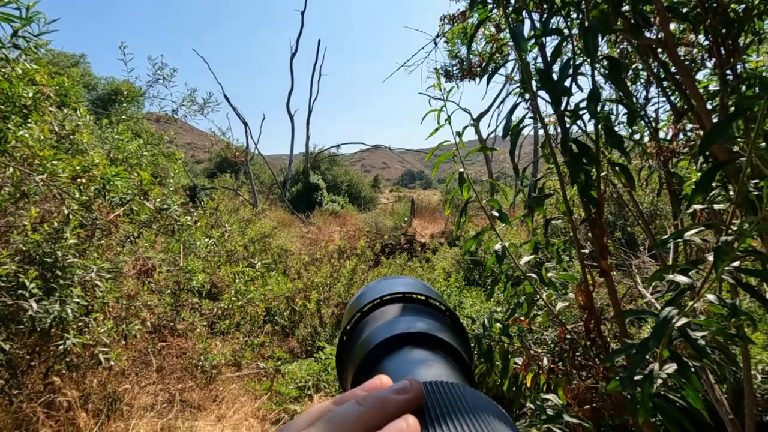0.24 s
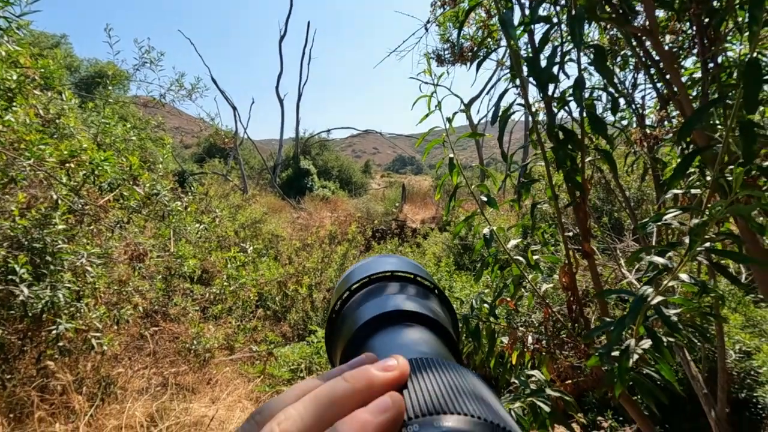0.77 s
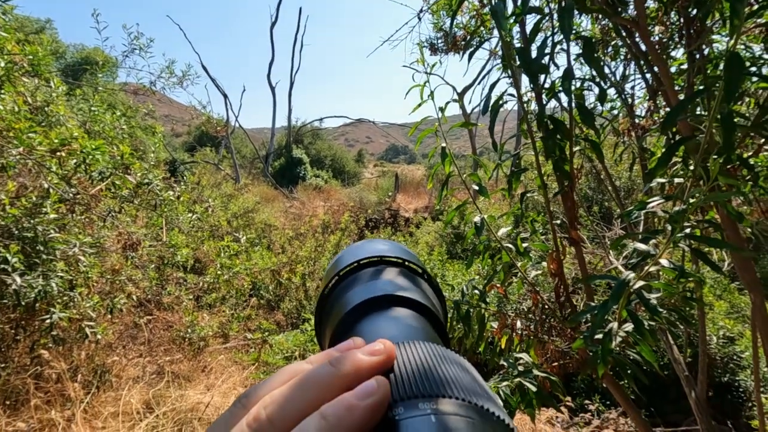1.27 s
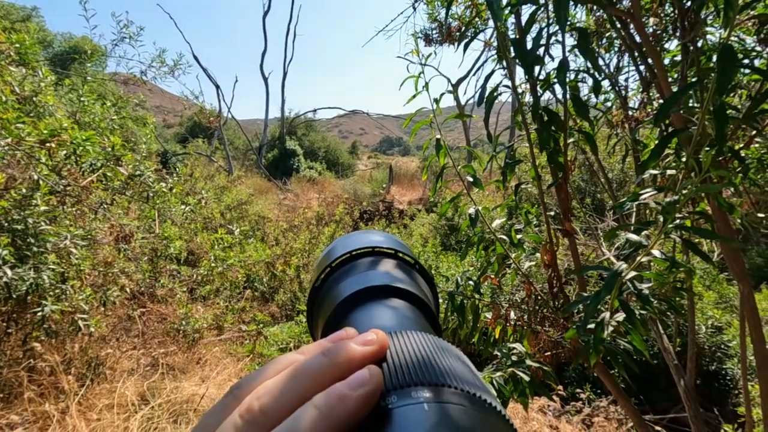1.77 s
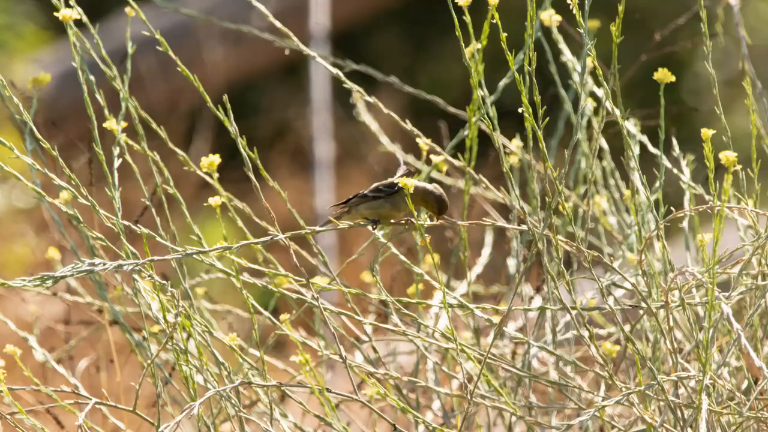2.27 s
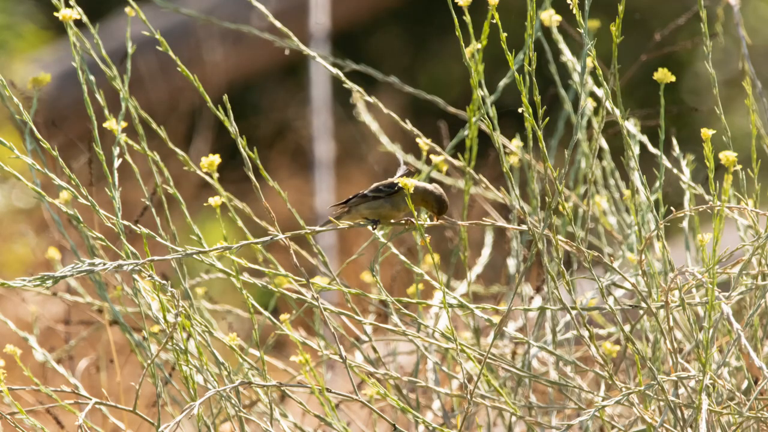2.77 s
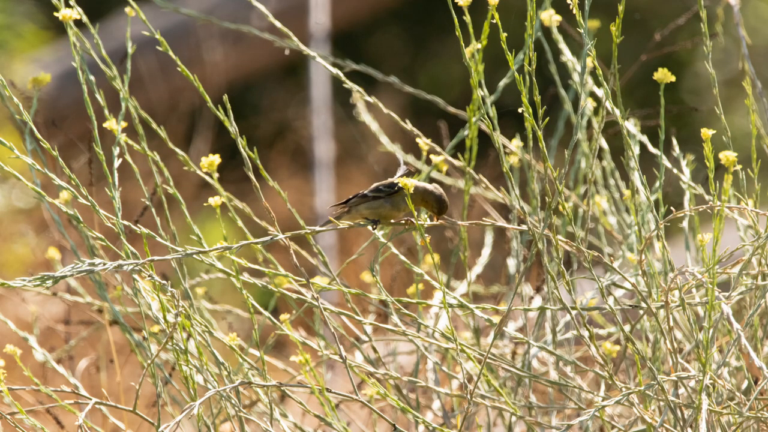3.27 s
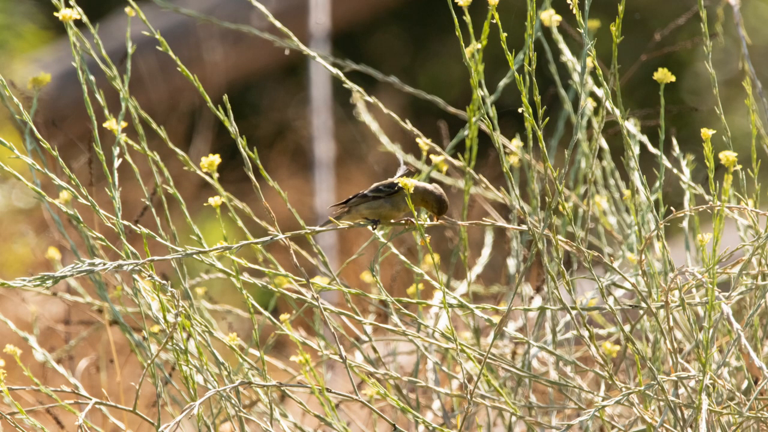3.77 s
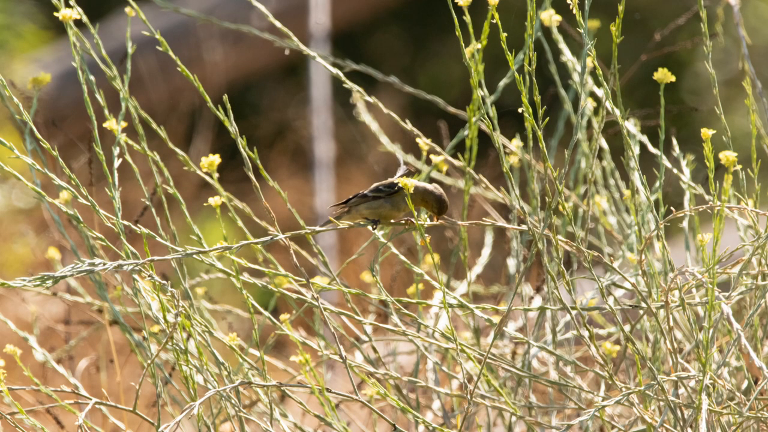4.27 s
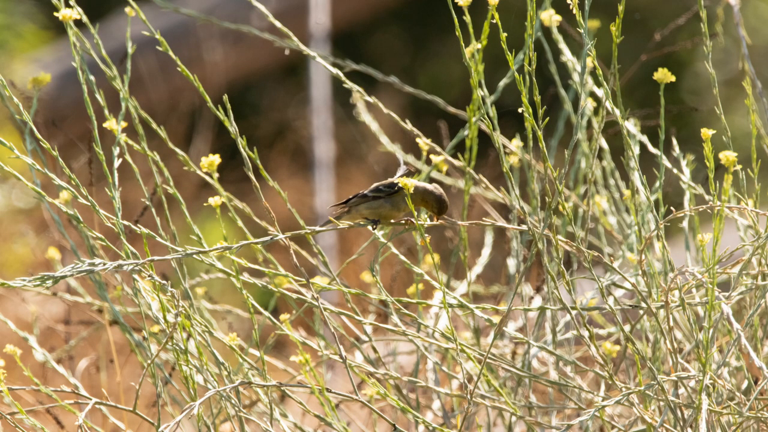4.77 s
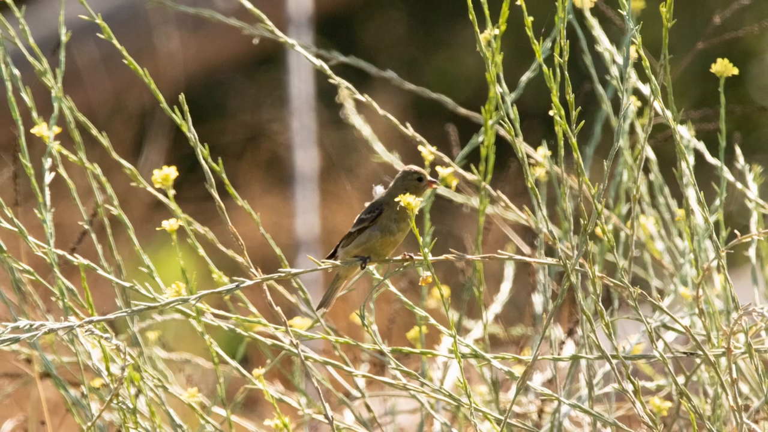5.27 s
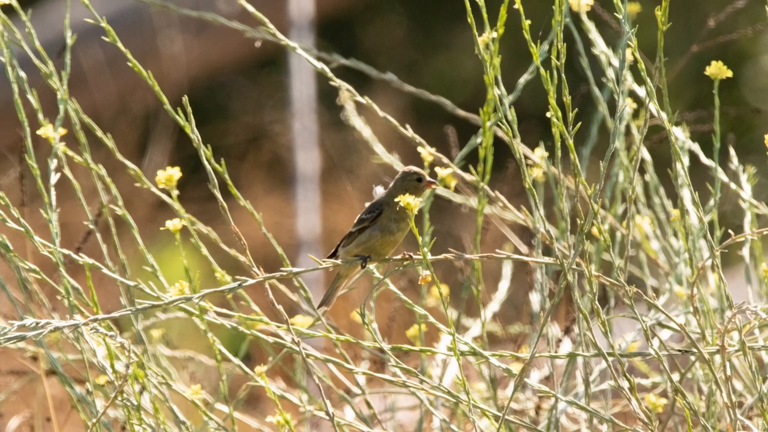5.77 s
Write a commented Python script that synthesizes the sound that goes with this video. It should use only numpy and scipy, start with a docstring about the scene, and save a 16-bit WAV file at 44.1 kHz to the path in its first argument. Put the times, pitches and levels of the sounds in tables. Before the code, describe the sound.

A camera takes two pictures close to the microphone, outdoors in scrubland. First, fingers tick and slide softly on the lens. Then a button clicks and the shutter fires with a short mechanical rattle, followed by a softer click as the button is released. This repeats about three seconds later. Throughout, small birds whistle and rasp faintly in the bushes over a low hum of distant engines and light wind rumble.

```python
"""Reflex camera in scrubland

Two pictures are taken close to the microphone. Each time the button clicks, then mirror, curtains and
recocking gear knock and rattle in the body; a hand ticks and slides on the lens. Small birds whistle
and rasp in the bushes, far engines hum and light air rumbles on the microphone."""
import sys
import numpy as np
from scipy import signal
from scipy.fft import rfft, irfft
from scipy.io import wavfile
from scipy.ndimage import uniform_filter1d

SR = 44100
rng = np.random.default_rng(int(sys.argv[2]) if len(sys.argv) > 2 else 0)


def wrap_up_sound(samples):
    """Save the sound to the file named by the first command line argument, as 16-bit audio."""
    columns = np.atleast_2d(samples).T
    # keep every value between -1 and 1, then stretch to whole-number steps
    tamed = np.clip(columns, -1, 1)
    steps = np.round(tamed * 32767).astype(np.int16)
    wavfile.write(sys.argv[1], SR, steps)


N = 265526
TIME = np.arange(N) / SR

# pictures: shutter opening t/s, mirror swing/s, relative release level/dB, mirror resonance f/Hz
SHOTS = [(2.184, .0325, -26, 2061), (4.9464, 0.018, -39.5, 3380)]
MIRROR_LEAD_S = 0.034   # mirror is up this long before the opening


def from_db(db):
    return 10 ** (np.asarray(db) / 20)


def unit_rms(x):
    return x / np.sqrt(np.mean(x ** 2) + 1e-20)


def in_time(rows):
    """Each column of a curve, at every sample."""
    s, *columns = np.transpose(rows)
    return [np.interp(TIME, s, c) for c in columns]


def add(out, s, sound):
    """Mix a sound in at time s."""
    at = max(round(s * SR), 0)
    out[..., at:at + sound.shape[-1]] += sound[..., :N - at]


def held(t, start, length, rise_db_per_s, fall_db_per_s):
    """Envelope: rises to 1 at the start, holds, dies away."""
    early, late = np.maximum(start - t, 0), np.maximum(t - start - length, 0)
    return from_db(-rise_db_per_s * early - fall_db_per_s * late)


def drift(rate_hz):
    """Random curve, spread about 1."""
    knots = rng.standard_normal(1000)
    return np.interp(TIME * rate_hz, np.arange(len(knots)), knots)


def stereo_noise(size, side_db):
    """White mid/side noise as left and right."""
    mid, side = rng.standard_normal((2, size))
    return mid + from_db(side_db) * np.array([side, -side])


def colour(x, spectrum, size=8192):
    """Minimum-phase filter of unit power gain; spectrum rows: f/Hz, level/dB."""
    hz, db = np.transpose(spectrum)
    log_f = np.log(np.maximum(np.arange(size // 2 + 1), 0.5) * SR / size)
    beyond = np.abs(log_f - np.clip(log_f, np.log(hz[0]), np.log(hz[-1])))
    log_gain = np.log(from_db(np.interp(log_f, np.log(hz), db))) - 2 * beyond   # 12 dB/octave skirts
    cepstrum = irfft(log_gain)
    response = irfft(np.exp(rfft(2 * cepstrum[:size // 2], size)))
    return signal.fftconvolve(x, [response / np.linalg.norm(response)])[:, :N]


def resonate(x, hz, width_hz):
    """One resonance, peak gain 1."""
    r = np.exp(-np.pi * width_hz / SR)
    poles = [1, -2 * r * np.cos(2 * np.pi * hz / SR), r * r]
    return signal.lfilter(np.array([1, 0, -1]) * (1 - r * r) / 2, poles, x + 1e-18)


def scatter(x, t60_s, side_db):
    """Diffuse echoes, unit gain."""
    tail = stereo_noise(SR, side_db) * from_db(-60 * TIME[:SR] / t60_s)
    return signal.fftconvolve(x, tail / np.linalg.norm(tail[0]), axes=1)[:, :N]


def open_air(wind_gain_db=3.5, traffic_gain_db=7, murmur_db=-65, hiss_db=-77.5):
    """Wind rumble, far traffic, a midrange murmur and a thin steady hiss."""
    # wind and traffic strength: t/s, relative level/dB
    gusts = [(1.8, -42.5), (2.6, -47.5), (3.4, -45), (6.02, -44)]
    traffic_level = [(0.0, -57.5), (1.07, -59.5), (2.73, -61), (3.42, -57), (4.93, -56.5), (6.02, -59)]
    # noise spectra: f/Hz, relative density/dB
    wind_spectrum = [(18, -2.5), (32, -2), (45, 3), (60, -6.5), (80, -7.5), (110, -18.5)]
    traffic_spectrum = [(70, -18), (110, 6.5), (290, 0), (420, -6), (700, -17), (1300, -23), (1900, -32.5)]
    hiss_spectrum = [(2500, -1), (7400, -1), (8400, -13), (9200, -6.5), (10150, 7), (10700, 2.5),
                     (11300, -6.5), (13500, -11.5), (14300, -29)]
    murmur_spectrum = [(400, 4), (1300, 4.5), (2000, -5.5), (2800, -20.5)]
    wind_db, = in_time(gusts)
    traffic_db, = in_time(traffic_level)
    wind = from_db(wind_db + wind_gain_db) * colour(stereo_noise(N, side_db=-20), wind_spectrum)
    wind *= from_db([[0], [1.5]])   # stronger on the right
    traffic = colour(stereo_noise(N, side_db=-18), traffic_spectrum)
    traffic *= from_db(traffic_db + traffic_gain_db)
    murmur = from_db(murmur_db) * colour(stereo_noise(N, side_db=-0.5), murmur_spectrum)
    hiss = from_db(hiss_db) * colour(stereo_noise(N, side_db=-5), hiss_spectrum)
    return wind + traffic + murmur + hiss


def engine_tone(hz, db, waver_db=3.5):
    """One engine line, its level wavering on the way through the air."""
    amplitude = np.sqrt(2) * from_db(db + waver_db * drift(7))
    return amplitude * np.sin(2 * np.pi * (np.cumsum(hz) / SR + rng.random()))


def engines(swell_at_s=4.62, swell_width_s=0.76, swell_db=-53.5, swell_hz=260.7, climb_hz_per_s=15):
    """Two far engines, one steady, one growing; a higher note climbs as it swells and fades."""
    # steady engine: t/s, f/Hz, relative level/dB
    drone = [(0.0, 141.1, -47), (1.32, 145.9, -46.5), (5.87, 147.8, -49.5)]
    # growing engine, second harmonic: t/s, f/Hz, relative level/dB
    second_harmonic = [(0.2, 242, -55.5), (1.6, 243.8, -58.5), (4.88, 240.3, -48), (5.9, 233.7, -57.5)]
    # its fundamental: t/s, relative level/dB
    fundamental = [(0.29, -58.5), (3.29, -54.5), (3.34, -47), (5.9, -48.5)]
    drone_hz, drone_db = in_time(drone)
    second_hz, second_db = in_time(second_harmonic)
    bass_db, = in_time(fundamental)
    firing_hz = second_hz / 2
    orders_db = [bass_db - 2, second_db - 3, second_db - 14]
    growing = sum(engine_tone(k * firing_hz, db) for k, db in enumerate(orders_db, 1))
    t = TIME - swell_at_s
    swell = np.exp(-(t / swell_width_s) ** 2) * engine_tone(swell_hz + climb_hz_per_s * t, swell_db)
    return engine_tone(drone_hz, drone_db - 3) + growing + swell


def syllable(length_s):
    """Progress 0-1 through a bird's note, and its rounded envelope."""
    u = np.linspace(0, 1, int(length_s * SR))
    return u, np.sqrt(np.abs(np.sin(np.pi * u)))


def whistle(length_s, hz, glide_oct, quaver_hz=55):
    """Gliding note with a fast quaver in pitch and flutter in level."""
    u, envelope = syllable(length_s)
    quaver, flutter = (unit_rms(uniform_filter1d(n, size=90)) for n in rng.standard_normal((2, len(u))))
    pitch_hz = hz * 2 ** (glide_oct * (u - 0.5)) + quaver_hz * quaver
    return envelope * unit_rms(np.exp(flutter / np.e) * np.sin(2 * np.pi * np.cumsum(pitch_hz) / SR))


def rasp(length_s, hz, width, throb_hz=95, throb_depth=0.25, chirp_db=-2, chirp_s=0.024):
    """Harsh call: a throbbing noise band with quick chirps inside it."""
    u, envelope = syllable(length_s)
    band = signal.butter(2, [hz * (1 - width / 2), hz * (1 + width / 2)], "band", fs=SR, output="sos")
    throb = 1 + throb_depth * np.sin(2 * np.pi * throb_hz * length_s * u)
    chirps = np.concatenate([whistle(chirp_s, hz * (1 + width * pitch), width * bend)
                             for pitch, bend in rng.uniform(-0.46, 0.5, (30, 2))])
    harsh = unit_rms(signal.sosfilt(band, rng.standard_normal(len(u))))
    return envelope * unit_rms(throb * harsh + from_db(chirp_db) * np.resize(chirps, len(u)))


def birds(echo_db=-6, direct_db=-5):
    """Whistles, scolds and buzzes, scattered by the bushes."""
    # whistles: t/s, length/s, f/Hz, glide/octaves, relative level/dB
    notes = [(0.1, 0.043, 7400, -0.27, -63), (0.17, 0.034, 4830, -0.61, -55),
             (.333, 0.059, 7200, -0.26, -66), (0.326, 0.14, 3910, -.02, -59.5),
             (0.392, 0.056, 4930, -0.51, -57.5), (0.748, 0.066, 5350, 0.21, -72),
             (0.77, 0.11, 6650, 0, -76.5), (0.871, 0.03, 5140, -0.17, -66),
             (0.975, 0.022, 4960, -0.17, -64.5), (1.15, 0.13, 4620, -0.24, -67.5),
             (1.284, 0.029, 5680, -0.15, -58), (1.339, 0.086, 4840, 0.23, -60),
             (2.367, 0.072, 3860, -.2, -60.5), (2.752, .048, 2700, 0.5, -61.5),
             (2.773, 0.041, 4370, -0.12, -59.5), (2.94, .09, 6040, .03, -73),
             (3.803, 0.022, 2950, 0.043, -60.5), (5.342, 0.026, 4280, -0.16, -56.5),
             (5.326, 0.036, 4370, 0, -63), (5.36, .12, 4460, 0, -68), (5.449, 0.055, 5610, -0.085, -66)]
    # short scolds: t/s, centre f/Hz, relative level/dB
    scolds = [(.595, 5100, -62), (1.258, 4280, -59), (1.35, 4660, -58), (1.478, 4200, -60),
              (3.254, 5050, -61), (3.33, 4330, -59.5), (3.528, 5200, -58), (3.66, 5130, -56.5)]
    # longer buzzes: t/s, length/s, centre f/Hz, width/centre, relative level/dB
    buzzes = [(0, 0.29, 4520, 0.52, -63.5), (0.341, 0.13, 3560, 0.327, -58.5),
              (2.39, 0.28, 3840, 0.29, -72), (2.74, 0.063, 5130, 0.2, -64.5),
              (2.798, 0.18, 3910, 0.4, -60.5), (3.982, .09, 4280, 0.52, -67.5),
              (4.186, 0.28, 4425, 0.309, -57.5), (4.568, 0.12, 6640, 0.247, -69.5),
              (5.096, .075, 5010, 0.213, -66.5), (5.203, 0.29, 3950, 0.31, -64.5),
              (5.495, 0.15, 4100, 0.29, -63), (5.636, 0.082, 3700, 0.26, -57)]
    whistles, calls = np.zeros((2, N))
    for s, length_s, hz, glide_oct, db in notes:
        add(whistles, s, from_db(db) * whistle(length_s, hz, glide_oct))
    for s, hz, db in scolds:
        add(calls, s, from_db(db) * rasp(length_s=0.0643, hz=hz, width=0.66))
    for s, length_s, hz, width, db in buzzes:
        add(calls, s, from_db(db) * rasp(length_s, hz, width))
    direct = calls + from_db(-2.5) * whistles   # whistlers are farther off
    echoes = scatter([calls + whistles], t60_s=0.55, side_db=-3)
    return from_db(direct_db) * direct + from_db(echo_db) * echoes


def knocks(rows, side_db, part_q, casing_db, casing_t60_s, casing_hz):
    """Each contact is a brief crunch coloured by the part hit; the duller casing sounds with it."""
    out, t = np.zeros((2, N)), TIME[:SR // 5]
    lowpass = signal.butter(2, casing_hz, fs=SR, output="sos")
    casing_decay = from_db(casing_db - 60 * t / casing_t60_s)
    for s, db, t60_s, hz, boost_db in rows:
        crunch = stereo_noise(len(t), side_db) * from_db(-60 * t / t60_s)
        casing = signal.sosfilt(lowpass, stereo_noise(len(t), side_db)) * casing_decay
        part = (from_db(boost_db) - 1) * resonate(crunch, hz, hz / part_q)
        add(out, s, from_db(db) * (crunch + casing + part))
    return out


def fingers(tick_t60_s=0.029, fade_db_per_s=201):
    """Soft ticks and a dull, lumpy rustle of the hand on the lens barrel."""
    # touches: t/s, relative level/dB, resonance f/Hz, boost/dB
    touches = [(0.153, -51, 2100, 10), (0.179, -57, 1920, 17), (0.39, -40, 1000, -3),
               (.432, -51, 7150, 15.5), (0.511, -42.5, 3400, 8.5), (0.544, -31, 3800, 9.5),
               (1.165, -43, 1570, 8), (1.194, -49.5, 1200, 10), (1.44, -54, 960, 12),
               (1.676, -43.5, 7250, 8.5), (5.207, -56.5, 1000, 13)]
    # slides: t/s, length/s, relative level/dB
    slides = [(0, 0.069, -59), (0.422, 0.15, -59), (1.09, .115, -67), (1.68, 0.035, -61)]
    # contact spectra: f/Hz, relative level/dB
    tick_spectrum = [(400, -3), (900, 3), (1700, -2.5), (2900, -15), (4000, -15), (7500, -16), (14000, -33)]
    rustle_spectrum = [(600, -6), (900, -1), (2000, -6), (2800, -16.5), (8000, -23), (13000, -32)]
    rows = [(s, db, tick_t60_s, hz, boost_db) for s, db, hz, boost_db in touches]
    ticks = knocks(rows, side_db=-11, part_q=8.6, casing_db=-11.5, casing_t60_s=0.24, casing_hz=1230)
    sliding = sum(from_db(db) * held(TIME, s, length_s, fade_db_per_s, fade_db_per_s)
                  for s, length_s, db in slides)
    catches = from_db(5 * np.minimum(drift(110), 2) - 1)
    rustle = sliding * catches * stereo_noise(N, side_db=-8)
    return colour(ticks, tick_spectrum) + colour(rustle, rustle_spectrum)


def button_clicks(rows, modes, q=13):
    """A short push rings the modes; a slow finger dulls the contact."""
    push, n = np.zeros(N), np.arange(SR // 20)
    for s, db, dull_hz in rows:
        r = np.exp(-2 * np.pi * dull_hz / SR)
        add(push, s, from_db(db) * (1 - r) ** 2 * (n + 1) * r ** n)   # two-pole low-pass pulse
    return sum((-1) ** k * from_db(db) * resonate(push, hz, hz / q) for k, (hz, db) in enumerate(modes))


def button(casing_db=-11, bushes_db=-34):
    """Pressed, the dome under the button snaps over; let go, the button knocks against its collar."""
    # presses and returns: t/s, relative level/dB, contact cutoff f/Hz
    presses = [(2.0427, -7.5, 3200), (2.0828, 2, 13000), (4.8146, 0.5, 13100)]
    returns = [(2.5959, -13.5, 2860), (5.3081, -10.5, 11100)]
    # modes of the dome with its seat, and of the collar: f/Hz, gain/dB
    dome_modes = [(850, 6), (1170, 8), (1560, 13), (2500, 7), (3380, 8.5), (5200, 9), (6200, 4),
                  (11500, -13)]
    collar_modes = [(870, 9), (1500, 7), (2450, 7.5), (3450, -7), (4900, -4), (6100, -8.5), (10200, -13),
                    (12000, -20)]
    clicks = button_clicks(presses, dome_modes) + button_clicks(returns, collar_modes)
    casing = from_db(casing_db) * scatter([clicks], t60_s=0.054, side_db=4.5)
    return clicks + casing + from_db(bushes_db) * scatter([clicks], t60_s=0.4, side_db=-5.5)


def blow_rows(release_t60_s=0.13, stop_db=-21, stop_t60_s=0.027, stop_hz=3300,
              mirror_boost_db=11, part_boost_db=7):
    """Contacts of both pictures: the mirror is let go and hits its stop; the other parts strike."""
    # mirror lever, mirror bounce, curtain, its brake and rebound, mirror return, its bounce, cocking latch:
    # t/s from the opening, relative level/dB, t60/s, resonance f/Hz
    cycle = [(-.0575, -26.5, 0.027, 4163), (-.0245, -26, 0.022, 3000), (-.0005, -13, 0.018, 1950),
             (0.011, -23, .018, 4500), (.017, -27, .022, 4390), (0.029, -16.5, 0.02, 3458),
             (0.0365, -19.5, 0.017, 2500), (.046, -21, 0.028, 3216)]
    rows = []
    for opening_s, swing_s, release_db, mirror_hz in SHOTS:
        up_s = opening_s - MIRROR_LEAD_S
        rows.append((up_s - swing_s, release_db, release_t60_s, mirror_hz, mirror_boost_db))
        rows.append((up_s, stop_db, stop_t60_s, stop_hz, mirror_boost_db))
        rows += [(opening_s + s, *blow, part_boost_db) for s, *blow in cycle]
    return rows


def snaps(rows, t60_s=0.008, highpass_hz=6500):
    """Metal meets metal in the first instant of a blow: a short, bright snap."""
    out, t = np.zeros((2, N)), TIME[:SR // 20]
    for s, db, *_ in rows:
        add(out, s, from_db(db - 60 * t / t60_s) * stereo_noise(len(t), side_db=-8.5))
    return signal.sosfilt(signal.butter(2, highpass_hz, "high", fs=SR, output="sos"), out)


def chatter(grain_db=1.5, slowing_s=0.031, dulling_db_per_s=250, dull_hz=2800):
    """Levers and gear teeth rattle through each cycle, duller as the gear slows."""
    # mirror lift, curtain drive, recocking: t/s from the opening, length/s, relative level/dB, sag/(dB/s)
    gear_runs = [(-.062, 0.038, -31, -0.5), (-.0035, 0.025, -27.5, 246.5), (0.03, .04, -24.5, 229)]
    out, t = np.zeros((2, N)), np.arange(-SR // 10, SR // 8) / SR
    drive = np.max([from_db(db - sag * np.maximum(t - s, 0))
                    * held(t, s, length_s, rise_db_per_s=4003, fall_db_per_s=1205.5)
                    for s, length_s, db, sag in gear_runs], axis=0)
    treble = from_db(-dulling_db_per_s * np.maximum(t - slowing_s, 0))
    for opening_s, *_ in SHOTS:
        teeth = np.repeat(rng.standard_normal(len(t)), 24)[:len(t)]   # 24-sample grains
        rattle = drive * unit_rms(from_db(grain_db * teeth)) * stereo_noise(len(t), side_db=-14)
        dull = signal.sosfilt(signal.butter(1, dull_hz, fs=SR, output="sos"), rattle)
        add(out, opening_s + t[0], dull + treble * (rattle - dull))
    return out


def thuds(mirror_db=-34, curtain_db=-27, t60_s=0.054):
    """The whole camera jolts when the mirror stops and when the curtains fire."""
    out, t = np.zeros((2, N)), TIME[:SR // 5]
    for opening_s, *_ in SHOTS:
        for s, db in [(opening_s - MIRROR_LEAD_S, mirror_db), (opening_s, curtain_db)]:
            add(out, s, from_db(db - 60 * t / t60_s) * stereo_noise(len(t), side_db=-21.5))
    return colour(out, [(70, -4.5), (280, 1.5), (550, 1), (800, -16)])


def shutter(body_db=-1.5, bushes_db=-37):
    """Blows and gear chatter shake the camera body and set its springs ringing."""
    # body colour: f/Hz, relative level/dB
    body_spectrum = [(120, -50.5), (200, -16), (352, -11), (641, -8.5), (842, -14.5), (992, -10),
                     (2060, -1.5), (2330, -3.5), (3420, -3.5), (7400, -10), (8000, -15), (10700, -19.5),
                     (11300, -27), (12400, -22), (15500, -47.5)]
    # body resonances: f/Hz, width/Hz, gain/dB
    body_modes = [(982, 93, 6.5), (1230, 45, -3), (1620, 90, -1.5), (2000, 160, -5.5), (2520, 73, -4),
                  (3324, 50, 0.5), (3760, 63, -3.5), (4640, 70, 1), (6630, 170, -3.5), (7000, 210, -3),
                  (8900, 170, 1), (9463, 150, 1)]
    # spring modes: f/Hz, impulse response level/dB, t60/s
    springs = [(2255, -86, .4), (2990, -81, .4), (3880, -86, .35), (4985, -82, .5)]
    rows, t = blow_rows(), TIME[:SR]
    blows = knocks(rows, side_db=-10, part_q=14, casing_db=-12.5, casing_t60_s=0.045, casing_hz=1400)
    shaken = colour(blows + snaps(rows) + chatter(), body_spectrum)
    resonances = sum(from_db(db) * resonate(shaken, hz, width_hz) for hz, width_hz, db in body_modes)
    body = from_db(body_db) * (shaken + resonances)
    ring = sum(from_db(db - 60 * t / t60_s) * np.sin(2 * np.pi * hz * t) for hz, db, t60_s in springs)
    ringing = signal.fftconvolve(body, [ring])[:, :N]
    echoes = from_db(bushes_db) * scatter(body, t60_s=0.58, side_db=-7.5)
    return body + ringing + echoes + thuds()


def mic_ports(x):
    """The two microphone ports hear the near camera with different colour and delay."""
    # left relative to right: f/Hz, level/dB, phase lead/rad
    balance = [(600, -1, -0.06), (1200, 1.3, 0), (1700, 1.5, -0.62), (3000, -3, -0.84), (5300, -1, -0.29),
               (8000, 1, 0.16), (12500, 3.5, -0.069)]
    log_hz = np.log(np.maximum(np.arange(N // 2 + 1) * SR / N, 1))
    at_hz, *columns = np.transpose(balance)
    db, lead_rad = (np.interp(log_hz, np.log(at_hz), c) for c in columns)
    half = np.array([[0.5], [-0.5]])
    return irfft(rfft(x) * from_db(half * db) * np.exp(1j * half * lead_rad), N)


def scene():
    return mic_ports(shutter() + button() + fingers()) + birds() + engines() + open_air()


def record(dry):
    """Steep low-pass."""
    cutoff_hz = 15900
    return signal.sosfilt(signal.ellip(10, 0.1, 80, cutoff_hz, fs=SR, output="sos"), dry)


dry = scene()
out = record(dry)
wrap_up_sound(out)
```